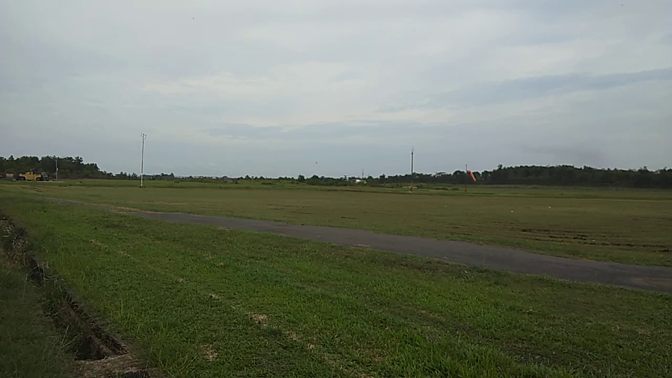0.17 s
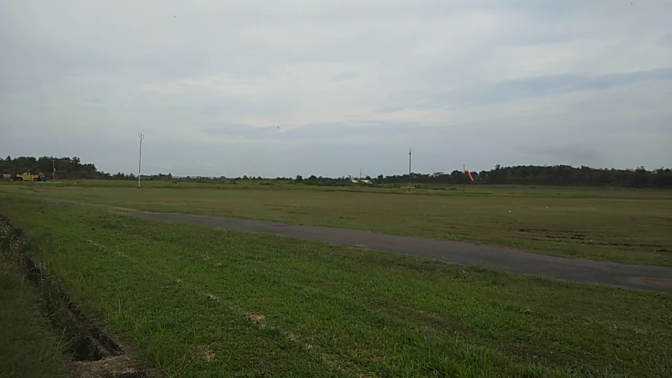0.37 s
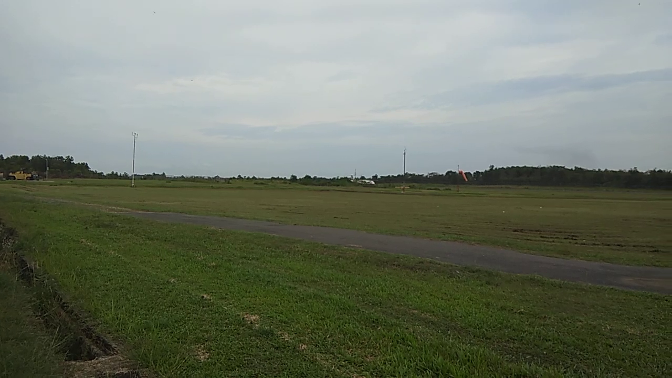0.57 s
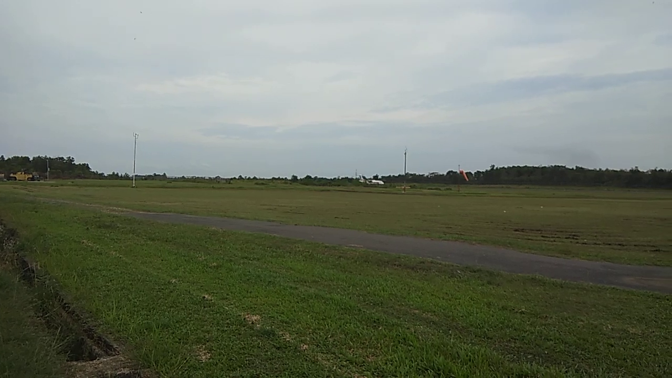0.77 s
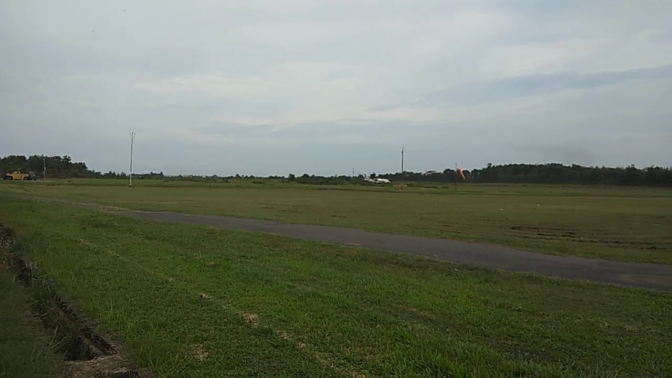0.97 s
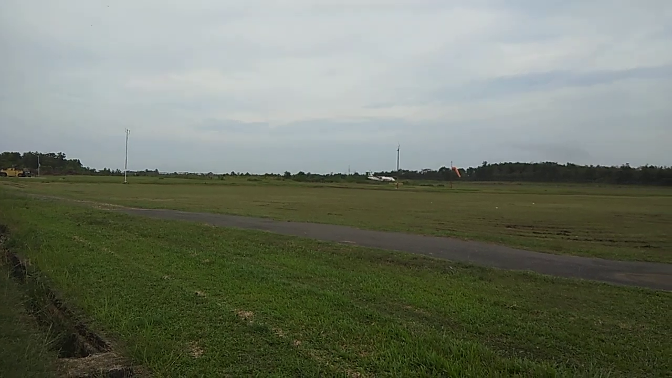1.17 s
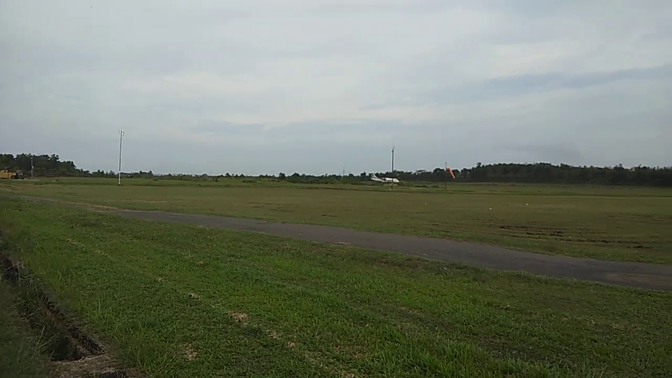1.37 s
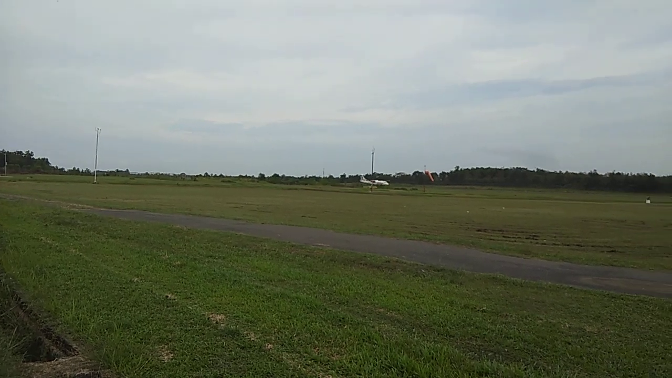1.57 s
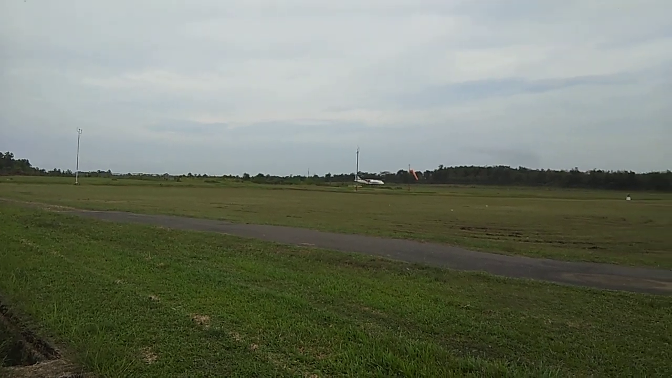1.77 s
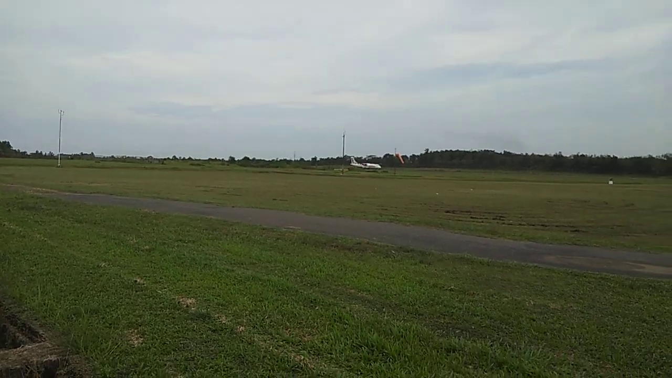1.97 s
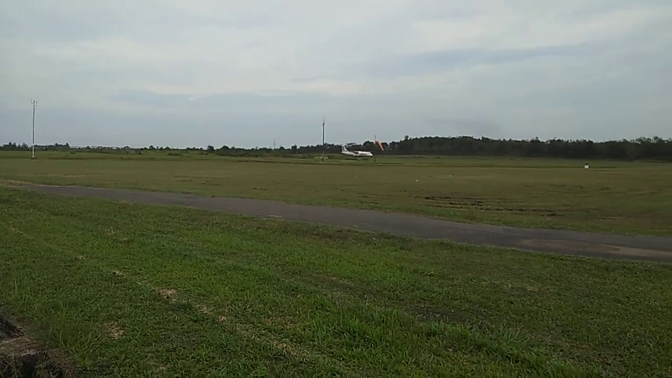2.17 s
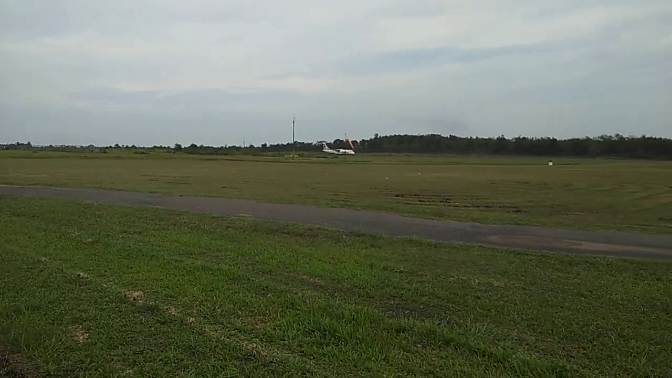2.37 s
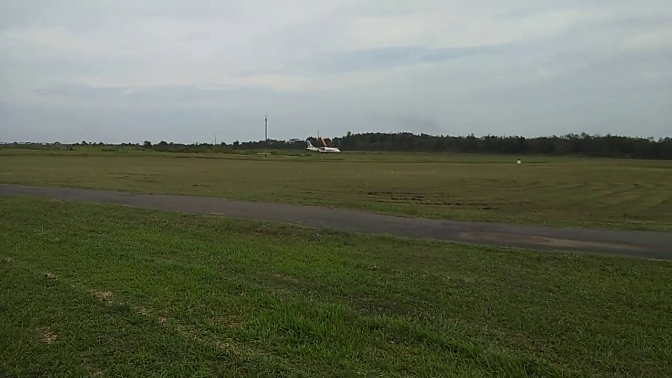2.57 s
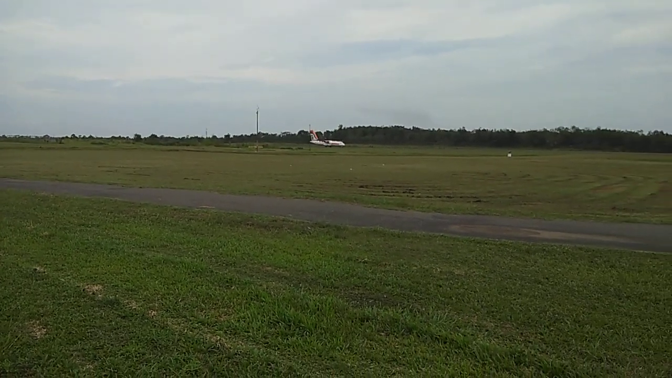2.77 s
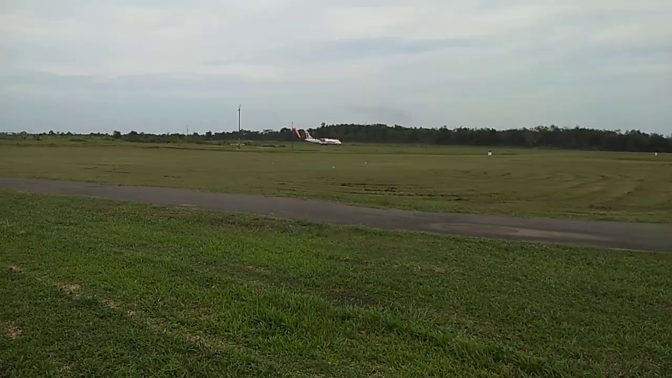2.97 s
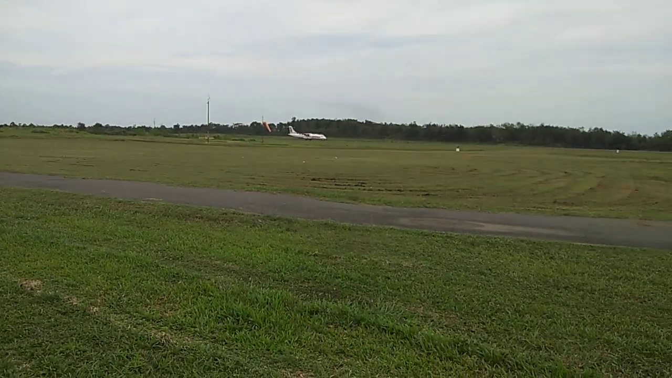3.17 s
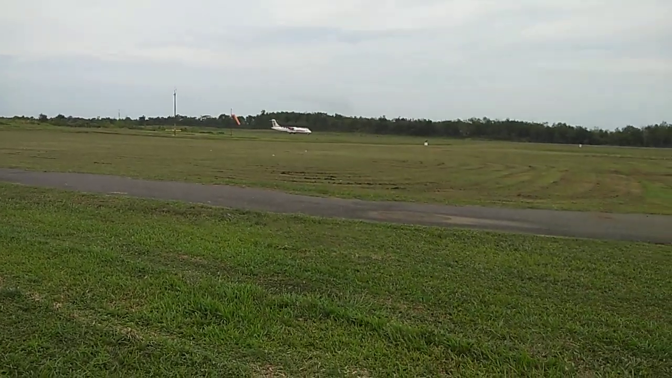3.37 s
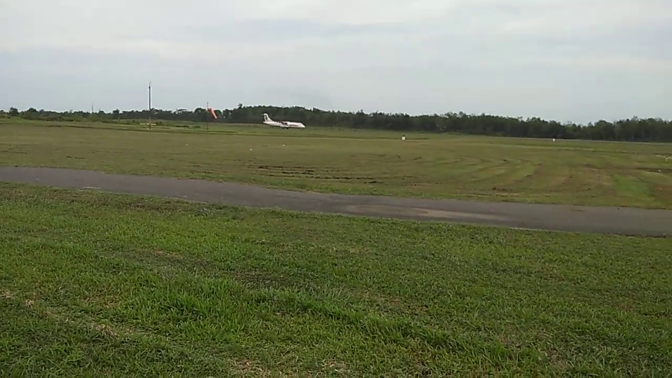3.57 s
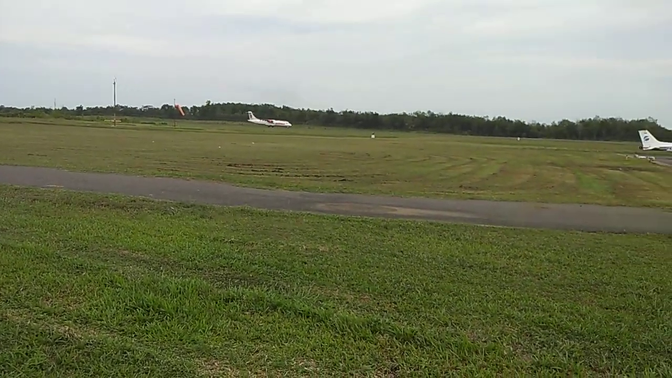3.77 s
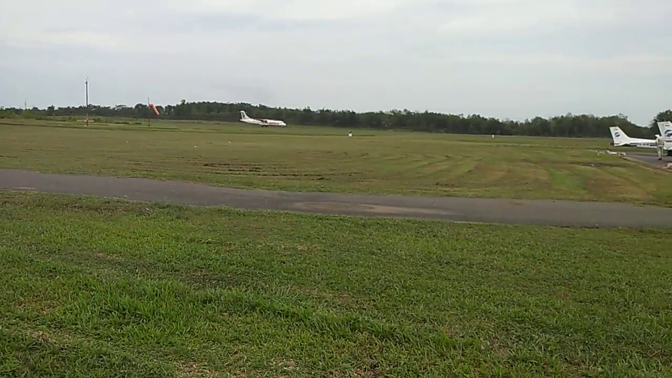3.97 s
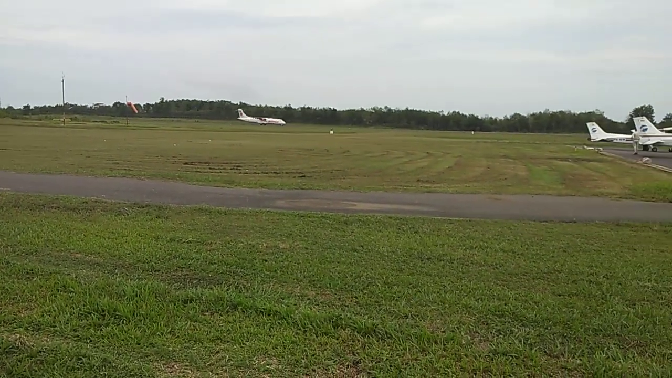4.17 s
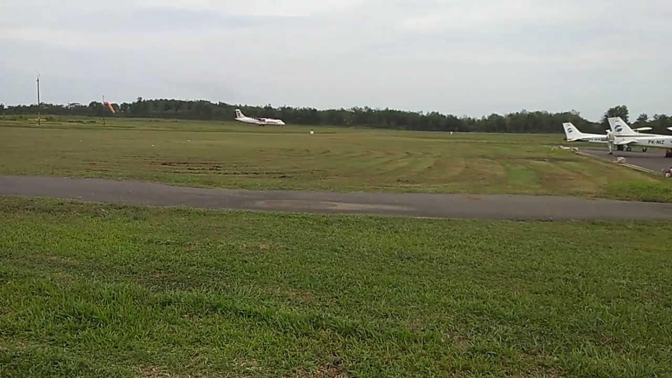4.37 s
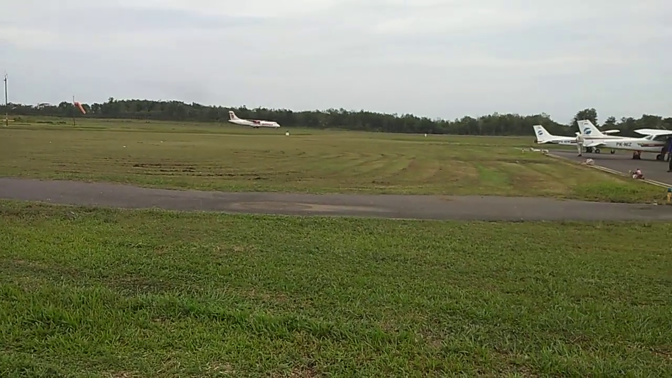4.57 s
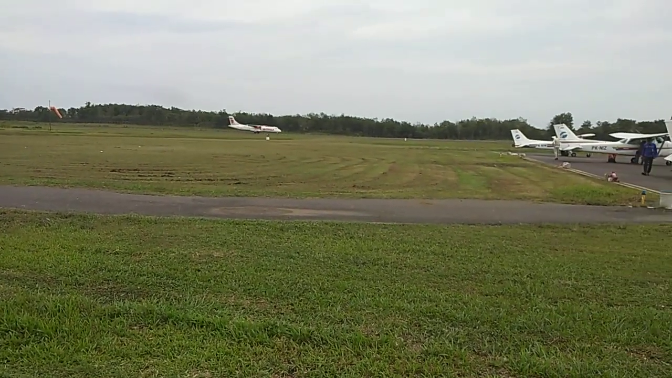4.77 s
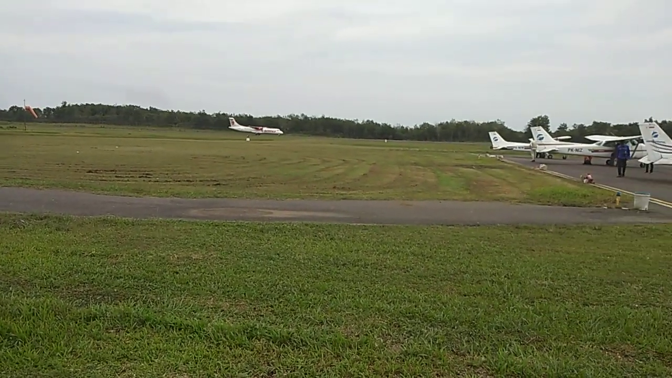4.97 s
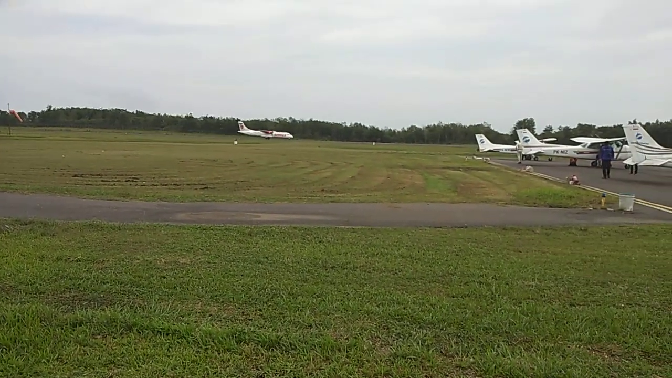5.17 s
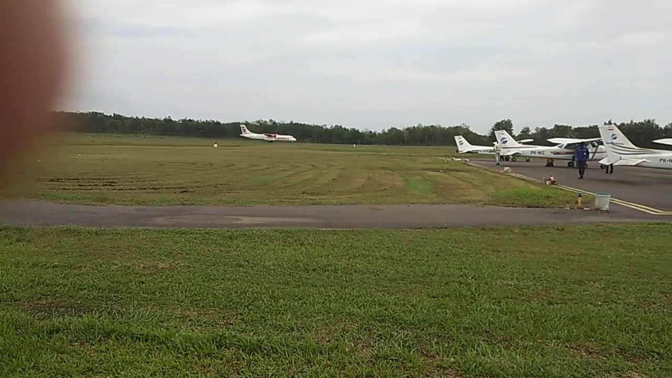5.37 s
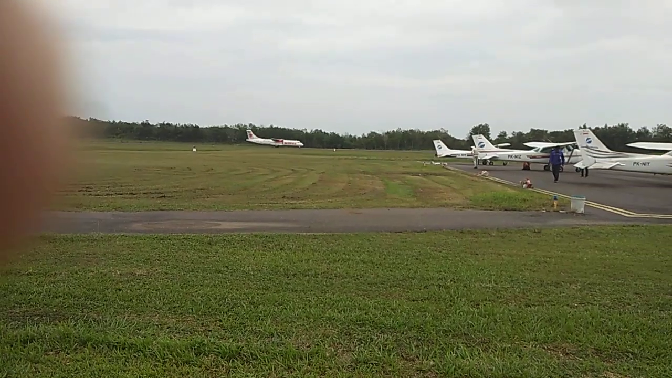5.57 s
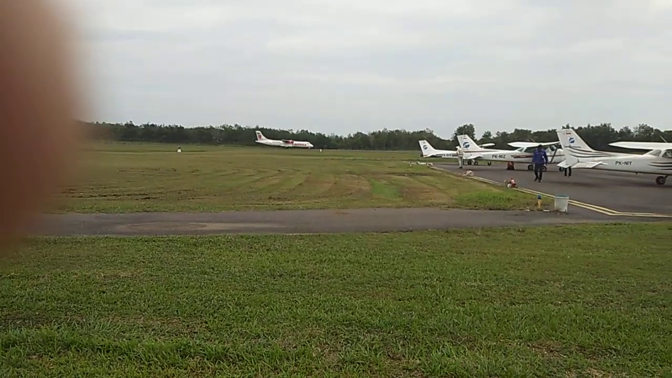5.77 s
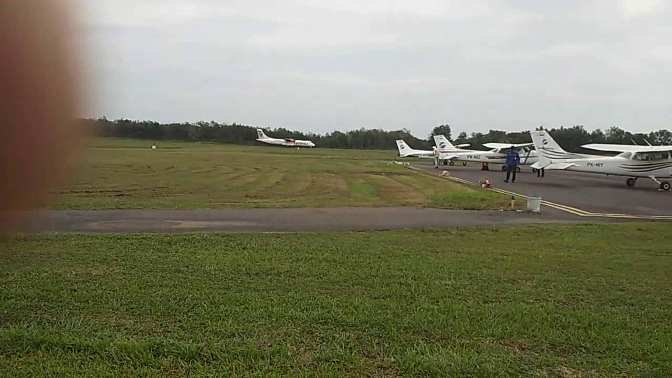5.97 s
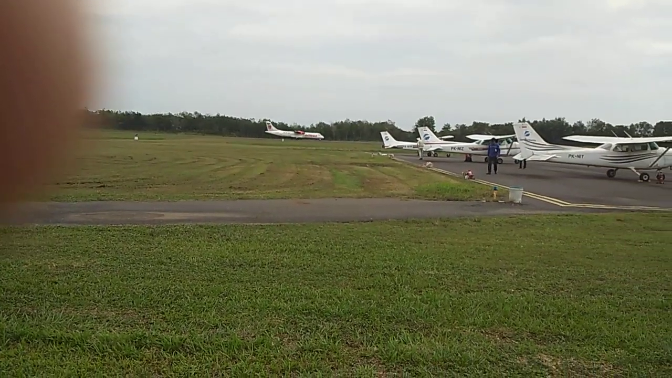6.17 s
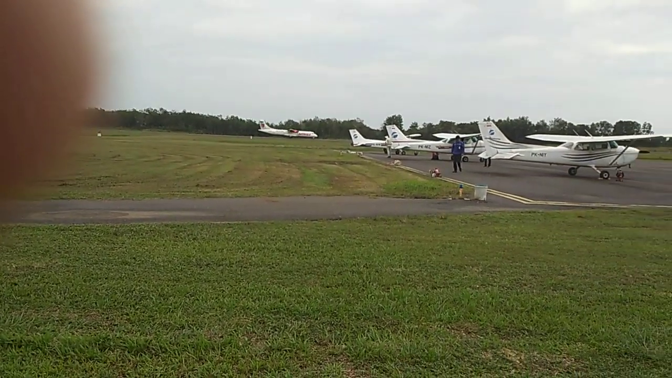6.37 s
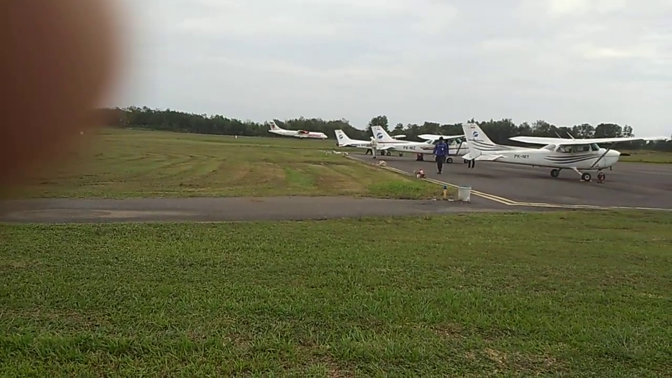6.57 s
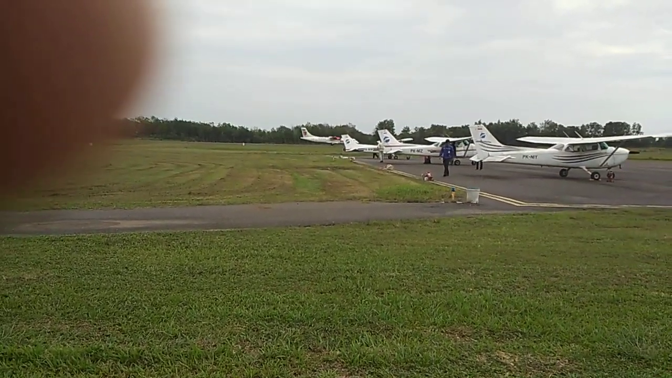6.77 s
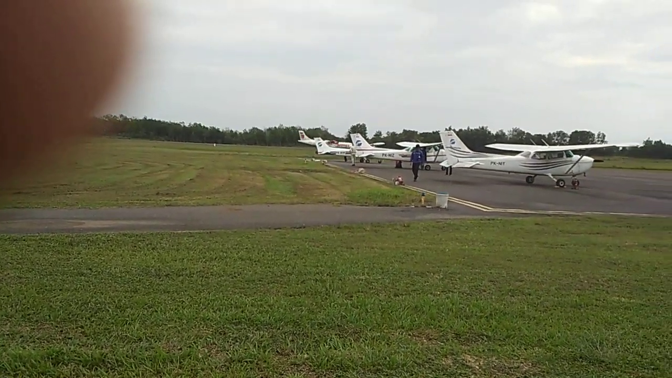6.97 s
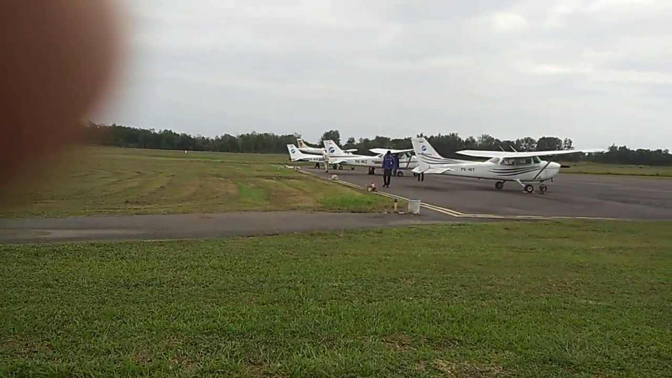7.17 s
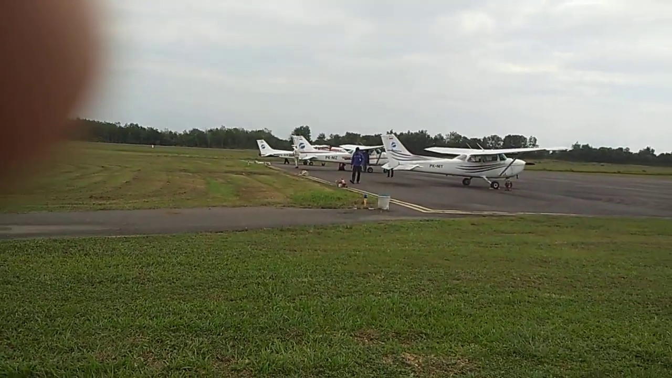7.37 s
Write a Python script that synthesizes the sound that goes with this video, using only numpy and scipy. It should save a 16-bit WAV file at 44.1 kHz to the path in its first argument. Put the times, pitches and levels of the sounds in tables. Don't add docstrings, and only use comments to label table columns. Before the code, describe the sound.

A distant twin-propeller airliner rolls along a runway, its low steady drone swelling from faint to dominant over soft rumble and gusty hiss.

```python
import sys
import numpy as np
from scipy import signal
from scipy.fft import rfft, irfft
from scipy.io import wavfile
from scipy.ndimage import uniform_filter1d

SR = 44100
rng = np.random.default_rng(int(sys.argv[2]) if len(sys.argv) > 2 else 0)


def dump_mix(stems):
    frames = np.atleast_2d(stems).T
    limited = np.clip(frames, -1, 1)
    pcm = np.round(limited * 32767).astype(np.int16)
    wavfile.write(sys.argv[1], SR, pcm)


def voltage_ratio(level):
    return 10 ** (np.asarray(level, float) / 20)


N = 327222

BLADE_HZ, ABEAM_S, SPEED_M_S, ACCEL_M_S2, NEAREST_M = 124.15, 6.136, 25, .21, 52.4

# (time [s], level [dB])
DRONE = [(.08, -40.5), (.7, -37.5), (1.6, -35), (2.3, -32), (3.1, -32.5), (3.7, -33), (4.0, -27),
         (4.3, -20.5), (4.6, -26), (4.9, -24), (5.12, -12.5), (5.4, -7.5), (5.65, -10), (6.0, -6.5),
         (6.5, -11.5), (6.9, -8), (7.25, -10.5), (7.42, -9.5)]
# (multiple of blade rate [1], centre [s], half width [s], level [dB])
LOBES = [(2, 1.1, .8, -46), (2, 4.1, .2, -38), (2, 4.7, .25, -38), (2, 5.42, .15, -35),
         (2, 5.85, .27, -24.5), (2, 6.3, .2, -30.5), (2, 6.73, .1, -29.5), (2, 7.0, .2, -40),
         (2, 7.25, .15, -32), (3, 5.4, .22, -41), (3, 6.0, .25, -52), (3, 6.8, .25, -54),
         (3, 7.35, .25, -45), (4, 5.7, .45, -56), (4, 6.5, .4, -54), (4, 7.15, .45, -52)]
# (time [s], level [dB])
RUMBLE = [(.08, -44), (.8, -41.5), (2.1, -38), (2.4, -35.5), (2.8, -36.5), (3.45, -28.5), (4.1, -30.5),
          (4.25, -27.5), (4.9, -29), (5.3, -26.5), (5.75, -24), (6.15, -30.5), (7.0, -28), (7.28, -31.5),
          (7.42, -31)]
# (frequency [Hz], level [dB])
RUMBLE_DEEP = [(15, -33), (45, -22.5), (62, -14), (85, -7), (110, -3), (135, -5), (170, -30.5), (220, -48)]
RUMBLE_LOW = [(70, -62), (110, -6.5), (145, -2.5), (190, -4.5), (240, -9.5), (300, -21.5), (400, -57.5)]
RUMBLE_HIGH = [(200, -39.5), (280, -0.5), (390, -7.5), (520, -13.5), (640, -19), (760, -50.5), (900, -65)]
# (time [s], level [dB])
JET = [(.08, -50), (.4, -47), (.7, -44.5), (1.25, -47), (1.47, -40.5), (2.33, -43), (2.45, -44.5),
       (2.9, -48.5), (3.38, -46), (3.7, -53), (4.3, -49.5), (4.5, -48.5), (5.05, -42.5), (5.5, -38.5),
       (5.8, -35), (6.1, -39.5), (6.27, -47), (7.42, -48.5)]
# (multiple of blade rate [1], level [dB])
CHOP = [(54, -12), (55, -7), (56, -7), (57, 0), (58, -1), (59, -2), (60, -7), (61, -12)]
# (centre [s], half width [s], level
# [dB])
CLEAR = [(.38, 0.17, 4), (1.45, 0.22, 4), (1.65, .03, 2), (2.65, 0.035, 1), (2.9, .15, 1),
         (3.35, 0.11, 0.5), (4.0, 0.14, 2.5), (4.55, 0.25, 6.5), (5.0, 0.057, 3), (5.2, 0.068, 3.5),
         (5.49, 0.036, 4.5), (5.63, 0.07, 3.5), (5.85, .1, -3.5), (6.03, 0.029, 1.5), (6.92, 0.1, 3),
         (7.2, .08, 0), (7.38, 0.046, 1)]
# (4-6 kHz level [dB], 7-9 kHz level [dB])
TILT = [
    (6, -2.5),
    (7, 5),
    (1.5, 0),
    (-3, -6),
]
# (4-6 kHz [dB per dB], 7-9 kHz [dB per dB])
AIR_LOSS = (0.13, 0.85)
# (time [s], bearing [0-3])
TURN = [
    (0, 0),
    (2.2, 0.35),
    (3, 0.77),
    (4, 0.94),
    (4.6, 2),
    (5.95, 2),
    (6.35, 3),
    (7.42, 3),
]
SCATTERED = [
    0.17,
    0.51,
    0.21,
    0.46,
]
# (frequency [Hz], ahead [rad], turning [rad], abeam [rad], shaded [rad])
LEAD = [(600.0, -0.5, -0.5, -0.4, -0.2), (740.0, -0.6, -1.2, -0.6, -0.4), (900.0, -0.5, -0.8, -0.4, -0.2),
        (1500.0, 0.3, -1.4, -1.4, -0.6), (2200.0, 0.8, -0.2, -1.1, -0.3), (2800.0, 1.1, -0.3, -1.8, -2.2),
        (3500.0, -0.7, -2.9, -3.1, -2.1), (4300.0, -0.1, -2.8, -3.6, -2.1), (5200.0, 0.5, -1.1, -2.8, -2.0),
        (6000.0, 2.1, -0.2, -1.4, -0.9), (6700.0, 3.5, -3.4, -3.6, -2.7), (7500.0, 5.4, -1.7, -4.1, -2.7),
        (8400.0, 6.2, -3.3, -4.1, -3.1), (9400.0, 6.1, -3.9, -5.9, -3.9)]
# (frequency [Hz], left level [dB], right level [dB])
AHEAD = [(556, -15, -20), (745, -23.5, -17.5), (800, -14.5, -13), (1600, -12.5, -6.5), (2150, -15.5, -7.5),
         (2700, -11, -18.5), (3550, -13.5, -15.5), (4150, -13.5, -4.5), (5200.0, -13.5, -0.5),
         (5830, -29, 1.5), (6770, -14, -6), (7320, -13, -17.5), (8400, -15.5, -40), (9540, -21.5, -52.0)]
TURNING = [(580, -27, -22), (774, -11, -10.5), (860, -12.5, -10.5), (1500.0, -12.5, -9.5), (2170, -16, -10),
           (2740, -13.5, -15.5), (3540, -15, -14), (4290, -12.5, -1), (5200.0, -16.0, 1), (5950, -11, 1.5),
           (6400, -16.5, -9), (7440, -7, -7), (8400, -7, -17), (9560, -19, -29.5)]
ABEAM = [(566, -16, -17.5), (740.0, -13.5, -12), (900.0, -11, -10), (1500.0, -8.0, -5), (2060, -8, -4),
         (2730, -9.5, -9), (3530, -12, -12), (4420, -9.5, -0.5), (5200.0, -13.5, -0.5), (5940, -15.5, -1.0),
         (6890, 0.5, -12.5), (7300, -2.5, -6), (8100, -6.5, -14), (9470, -9, -27.5)]
SHADED = [(544, -2, -3.5), (705, -7, -6.5), (855, -4.5, -4.5), (1500.0, -7.5, -5.5), (2070, -6, -6),
          (2800.0, -10.5, -11.5), (3500.0, -12.5, -14.5), (4200, -6.5, -1), (5200.0, -10, -2),
          (5940, -20, -5), (6600, -7.5, -11), (7460, -6.5, -10), (8600, -9.5, -19.5), (9470, -18.5, -36.5)]
# (frequency [Hz], level [dB])
SELF_NOISE = [(11000, -40), (11900, -12), (12700, -3), (13500, 0), (15200, 0), (15600, -40)]


def propellers(turns):
    hz = run_past()[0]
    drone_db, = curve(DRONE)
    tone = voltage_ratio(drone_db + .5 * walk(14)) * np.sin(turns + .031 * walk(11))
    for k in (2, 3, 4):
        lobes = sum(voltage_ratio(db) * bump(s, width) for multiple, s, width, db in LOBES if multiple == k)
        tone += lobes * voltage_ratio(.4 * k * walk(9)) * np.cos(k * turns + .03 * k * walk(10))
    ripple = 2 * np.pi * 100 * np.arange(N) / SR
    tone += voltage_ratio(drone_db - 27 + 1.3 * (hz - 131.5)) * np.sin(turns - ripple)
    return np.sqrt(2) * tone


def rumble():
    low_db, = curve(RUMBLE)
    near_db = run_past()[2]
    deep_db = -17 + .53 * low_db + .035 * near_db
    high_db = -34 + .2 * low_db + .92 * near_db
    layers = ((RUMBLE_DEEP, deep_db, -11), (RUMBLE_LOW, low_db + 2, -17), (RUMBLE_HIGH, high_db, -10))
    opposed = np.array([[1], [-1]])
    out = 0
    for points, db, side_db in layers:
        swell = voltage_ratio(db + .7 * walk(6))
        out = out + swell * (coloured(points) + voltage_ratio(side_db) * opposed * coloured(points))
    return out


def compressor_whine(turns, ahead):
    beam_edge, off_beam_db = .8, -14
    whine = 0
    for multiple, db in CHOP:
        phase = round(multiple) * turns
        whine = whine + voltage_ratio(db) * (walk(80) * np.sin(phase) + walk(80) * np.cos(phase))
    level_db = -8 + off_beam_db / (1 + np.exp((ahead - beam_edge) / .015))
    return rfft(unit(whine) * voltage_ratio(level_db + walk(18)))


def jet(turns):
    hiss_db, = curve(JET)
    turn, = curve(TURN)
    _, ahead, near_db = run_past()
    clear_db = sum(db * bump(s, width) for s, width, db in CLEAR)
    middle_db, top_db = [np.interp(turn, range(len(TILT)), db) + clear_db + loss * near_db
                         for db, loss in zip(np.transpose(TILT), AIR_LOSS)]
    whine = compressor_whine(turns, ahead)
    shapes = ([1, 0, 0, 0], [0, 1, 1, 0], [0, 0, 0, 1])
    bands = [over_hz([3100, 3800, 5900, 6900], shape) for shape in shapes]
    gust_db = .7 * walk(11) + .6 * walk(40)
    levels = [voltage_ratio(hiss_db + db + gust_db + .39 * walk(11)) for db in (1.1, middle_db + .15, top_db + .12)]
    out = 0
    for k in range(len(SCATTERED)):
        both = ports(noise() + whine, k)
        share = np.sqrt(np.clip(1 - abs(turn - k), 0, 1))
        for band, level in zip(bands, levels):
            part = irfft(both * np.sqrt(band), N)
            out = out + share * level * part / np.std(part.mean(axis=0))
    return out


def run_past():
    s = np.arange(N) / SR - ABEAM_S
    along = SPEED_M_S * s + ACCEL_M_S2 * s ** 2 / 2
    far = np.hypot(along, NEAREST_M)
    receding = (SPEED_M_S + ACCEL_M_S2 * s) * along / far
    hz = BLADE_HZ / (1 + receding / 343)
    return hz, -along / far, 20 * np.log10(NEAREST_M / far)


def ports(wave, k):
    hz, left_db, right_db = np.transpose((AHEAD, TURNING, ABEAM, SHADED)[k])
    grid_hz = np.r_[400, hz, 11000, 12500]
    left, right = [voltage_ratio(over_hz(grid_hz, np.r_[-60, db, db[-1] - 26, db[-1] - 45]))
                   for db in (left_db, right_db)]
    lead_table = np.transpose(LEAD)
    lead = over_hz(lead_table[0], lead_table[k + 1])
    mix = SCATTERED[k]
    heard = [np.sqrt(1 - mix) * wave + np.sqrt(mix) * noise() for _ in range(2)]
    return np.array([left * np.exp(1j * lead) * heard[0], right * heard[1]])


def band_power(z):
    power = (abs(z[:-1]) ** 2).reshape(-1, 8, z.shape[-1]).mean(axis=1)
    return np.repeat(power, 8, axis=0)


def treble_dropout(x, floor_db, under_db):
    hz, _, z = signal.stft(x, SR, "cosine", nperseg=2048)
    hz = hz[:-1, None]
    mid, side = z[0] + z[1], z[0] - z[1]
    mid_power = band_power(mid)
    busy_db = 10 * np.log10(mid_power.max(axis=0) / mid_power.max() + 1e-12)
    survives = mid_power > band_power(side) * voltage_ratio(2 * under_db + .3 * busy_db)
    mid[:-1] *= (abs(hz - 3650) > 300) | survives
    z = np.array([mid + side, mid - side]) / 2
    treble = (band_power(z[0]) + band_power(z[1])) * (hz > 1000)
    loudest = uniform_filter1d(treble.max(axis=0), size=25)
    for port in z:
        port[:-1] *= (band_power(port) > loudest * voltage_ratio(2 * floor_db)) | (hz < 7000)
    return signal.istft(z, SR, "cosine", nperseg=2048)[1][:, :N]


def self_noise():
    level = voltage_ratio(-54 + .6 * curve(JET)[0])
    return level * np.array([coloured(SELF_NOISE), coloured(SELF_NOISE)])


def coloured(points):
    hz, db = np.transpose(points)
    shape_db = over_hz(np.r_[hz, 8 * hz[-1]], np.r_[db, db[-1] - 60])
    return unit(irfft(noise() * voltage_ratio(shape_db), N))


def noise():
    return rfft(rng.standard_normal(N))


def walk(rate):
    k = int(SR / rate)
    held = np.repeat(rng.standard_normal(N // k + 1), k)
    return unit(uniform_filter1d(uniform_filter1d(held, k), k)[:N])


def bump(centre_s, width_s):
    return np.exp(-((np.arange(N) / SR - centre_s) / width_s) ** 2)


def curve(table):
    s, *columns = np.transpose(table)
    return [np.interp(np.arange(N) / SR, s, c) for c in columns]


def over_hz(hz, values):
    return np.interp(np.log(np.fft.rfftfreq(N, 1 / SR) + 1), np.log(hz), values)


def unit(x):
    return x / np.sqrt(np.mean(x ** 2))


def scene():
    turns = 2 * np.pi * np.cumsum(run_past()[0]) / SR
    left, right = propellers(turns) + rumble()
    low = np.array([voltage_ratio(-.14) * np.roll(left, 4), voltage_ratio(.3) * right])
    return low + jet(turns)


def top_cut(x):
    return signal.sosfilt(signal.butter(12, 15140, fs=SR, output="sos"), x)


def record(dry):
    start_s, settle_s, settle_db = .0805, .12, -8.5
    x = treble_dropout(dry, floor_db=-32, under_db=-9.5) + self_noise()
    gain = voltage_ratio(settle_db * bump(start_s, settle_s))
    started = np.arange(N) / SR > start_s
    return top_cut(x * gain * started)


dry = scene()
out = record(dry)
dump_mix(out)
```